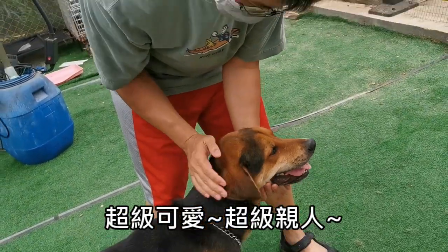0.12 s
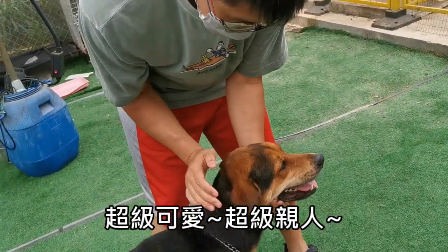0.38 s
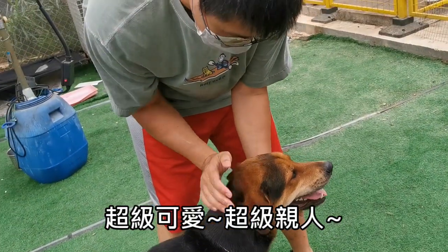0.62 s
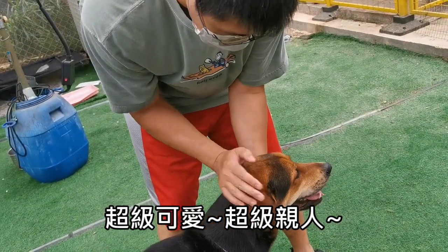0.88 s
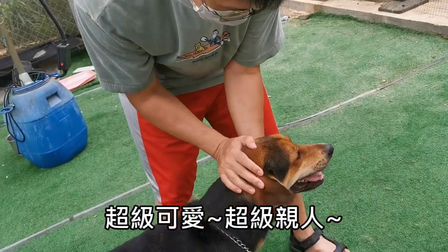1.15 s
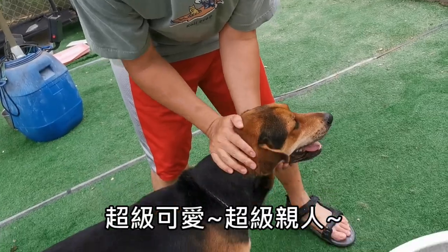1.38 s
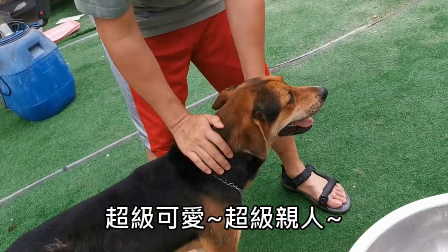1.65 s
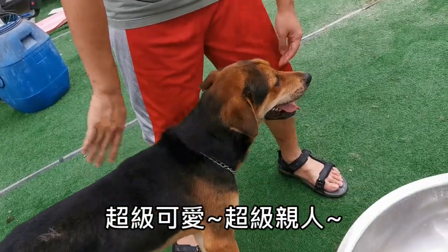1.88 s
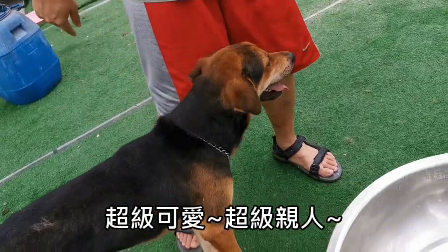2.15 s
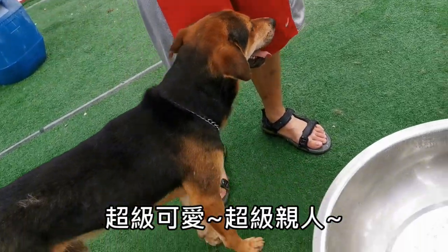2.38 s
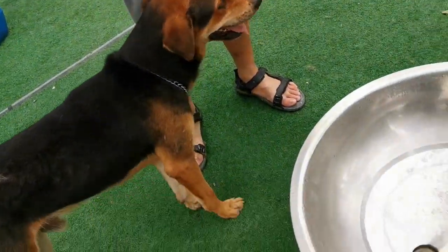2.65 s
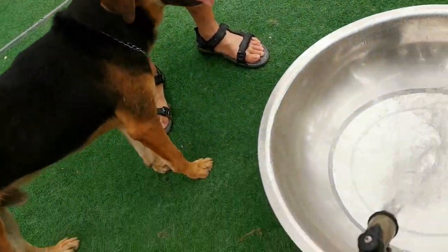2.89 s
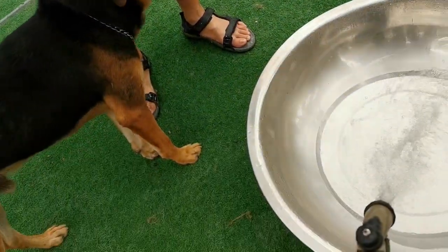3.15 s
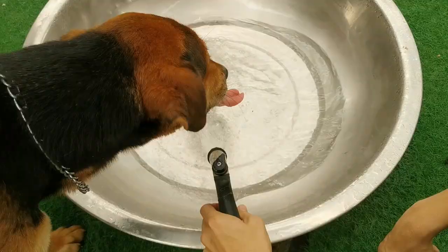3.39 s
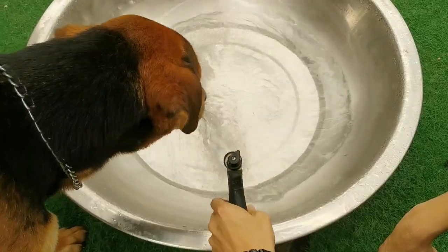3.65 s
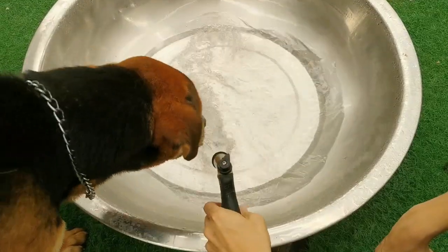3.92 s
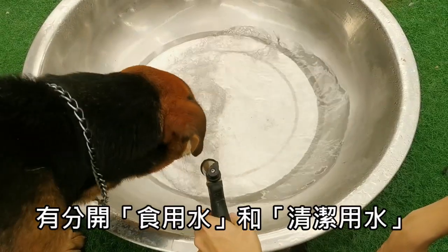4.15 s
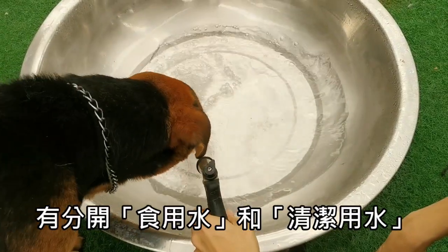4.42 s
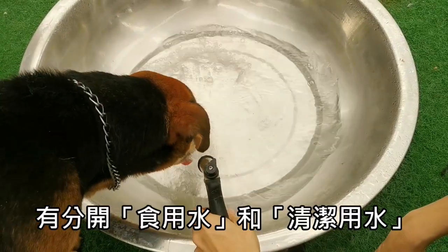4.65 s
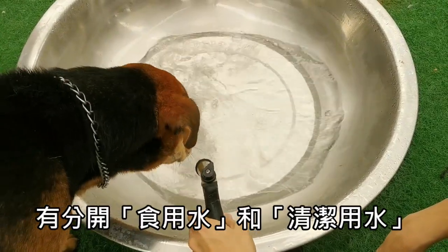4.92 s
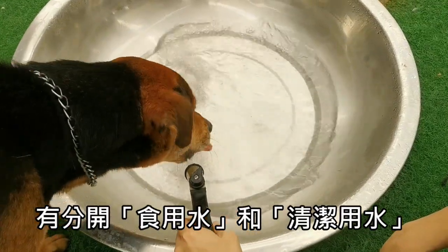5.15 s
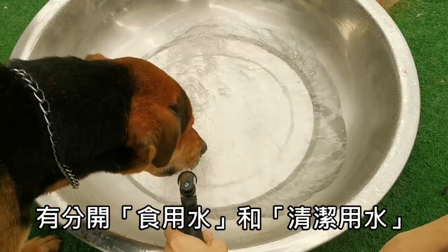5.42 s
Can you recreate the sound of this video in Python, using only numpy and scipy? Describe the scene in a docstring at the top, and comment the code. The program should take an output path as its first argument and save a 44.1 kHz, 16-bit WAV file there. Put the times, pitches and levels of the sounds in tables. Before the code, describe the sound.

Outdoors, a hand-held phone picks up a hose jet drumming hollowly on a big thin steel bowl, with hissing spray and crisp spatters. A low wavering pump-like hum and rumble lie beneath. Just after three seconds a quick cluster of dull thumps knocks the bowl, then all sound cuts to a short silence. The water returns softer and less metallic, running over shallow water until the end.

```python
"""Hose jet in a steel bowl

Outdoors, a hose jet fills a large steel bowl, heard by a hand-held phone with two unlike microphone ports.
First part: the jet drums the thin bowl (noise through its modes), spatters on the steel (short treble bursts),
and something bumps the bowl (dying low modes). After a silence, second part: the jet runs quieter over shallow
water (flickering noise). A pump-like hum of wavering tones and a low noise rumble lie under both."""
import sys
import numpy as np
from scipy import signal
from scipy.fft import rfft, irfft, next_fast_len
from scipy.io import wavfile
from scipy.ndimage import uniform_filter1d, map_coordinates

SR = 44100
rng = np.random.default_rng(int(sys.argv[2]) if len(sys.argv) > 2 else 0)


def gain_from_db(level_db):
    """Convert decibel levels to linear amplitude factors (20 dB per decade)."""
    decades = np.asarray(level_db, float) / 20
    return 10 ** decades


def waveform_to_disk(signal):
    """Save audio, clipped to [-1, 1], as 16-bit WAV at the path in sys.argv[1]."""
    frames = np.transpose(np.atleast_2d(signal))
    scaled = np.clip(frames, -1, 1) * 32767
    samples = np.round(scaled).astype(np.int16)
    wavfile.write(sys.argv[1], SR, samples)


N = 244446
PADDED = next_fast_len(N + 8192)  # samples, so that filter tails do not wrap round

# the jet, one table a part: (time [s], splash level [dB], spray level [dB], landing place [0 floor centre - 1 wall])
JET = [
    [(0, -28.5, -31, 0.33), (.25, -31, -33.5, 0.34), (.5, -27.5, -30.5, .15), (.8, -26, -29.5, 0.023),
     (1.1, -30, -29.5, 0.25), (1.31, -27, -30, 0.23), (1.6, -29, -28, 0.28), (1.8, -29.5, -30.5, .6),
     (2.0, -28.5, -29.5, 0.37), (2.3, -30.5, -30, 0.44), (2.46, -29.5, -28, 0.59), (2.62, -30, -28.5, 0.63),
     (2.8, -27.5, -28, 0.94), (3.0, -31.5, -30, 0.7), (3.28, -28.5, -28, 0.78)],
    [(3.65, -30.5, -39, 1), (3.92, -28, -37, .9), (4.2, -28.5, -35, 0.49), (4.5, -29, -35.5, 0.27),
     (4.75, -29.5, -36.5, .3), (5.0, -28.5, -34, .2), (5.27, -29, -33.5, 0.4), (5.54, -30, -36, 0.72)],
]
# the bed under the jet, one table a part: (time [s], rumble level [dB], hum level [dB])
GROUND = [
    [(0, -35, -35.5), (1, -31.5, -32), (2, -32, -34), (3.2, -29.5, -32)],
    [(3.65, -35.5, -31.5), (4.4, -35.5, -29.5), (5.54, -34, -31.5)],
]


def unit(x, lo_hz=0, hi_hz=30000):
    """Scale so that the mean of the two ports has rms 1 inside the band."""
    hz = np.fft.rfftfreq(N, 1 / SR)
    middle = np.atleast_2d(x).mean(0)
    inside = np.abs(rfft(middle))[(hz >= lo_hz) & (hz < hi_hz)]
    return x * N / np.sqrt(2 * np.sum(inside ** 2))


def along(points, hz):
    """Columns of (frequency [Hz], value, ..) points, interpolated on a log frequency axis."""
    knots_hz, *columns = np.transpose(points)
    return np.array([np.interp(np.log(hz + 1), np.log(knots_hz + 1), column) for column in columns])


def curves(rows):
    """One value per sample for each column after the time."""
    knots_s, *columns = np.transpose(rows)
    return [np.interp(np.arange(N) / SR, knots_s, column) for column in columns]


def wobble(rate):
    """A smooth random curve, rate knots a second."""
    knots = rng.standard_normal(int(N * rate / SR) + 4)
    return map_coordinates(knots, [np.arange(N) * rate / SR])


def filtered(x, response):
    """x times a complex response of frequency."""
    hz = np.fft.rfftfreq(PADDED, 1 / SR)
    return irfft(rfft(x, PADDED) * response(hz), PADDED)[..., :N]


def band(lo_hz, hi_hz, order=6):
    """Pass band; a higher order gives steeper edges."""
    def response(hz):
        below = (lo_hz / (hz + 1)) ** (2 * order)
        above = (hz / hi_hz) ** (2 * order)
        return 1 / np.sqrt((1 + below) * (1 + above))
    return response


def modes(table):
    """Causal response of a set of damped resonances with alternating signs."""
    def response(hz):
        return sum((-1) ** k * gain_from_db(db) * 1j * hz * width / (centre * centre - hz * hz + 1j * hz * width)
                   for k, (centre, width, db) in enumerate(table))
    return response


def ports(part, lo_hz, hi_hz):
    """The two microphone ports' unlike colour of the water, inside one band."""
    # one table a part: (frequency [Hz], left relative density [dB per Hz], right relative density [dB per Hz])
    port_colour = [
        [(200, -50, -53.5), (686, -58.5, -52.5), (1590, -57.5, -54.5), (2240, -62.5, -52), (2640, -62.5, -52),
         (3900, -62.5, -59.5), (5300, -65, -63.5), (7120, -68, -57), (7620, -65.5, -67), (9370, -65.5, -60.5),
         (10080, -72, -61.5), (10500, -74, -55.5), (12100, -74, -62.5), (13300, -81, -58.5), (14000, -76, -70),
         (15400, -72, -59.5)],
        [(200, -65, -59.5), (606, -60, -57.5), (1400, -67.5, -58), (1790, -68.5, -57), (2320, -70, -56),
         (3130, -73.5, -61), (3930, -64, -67), (4600, -62, -70.5), (5900, -61.5, -59.5), (7400, -63, -71.5),
         (9000, -68, -67), (10100, -74, -66), (10550, -86, -57), (12300, -83, -67), (14000, -71.5, -71),
         (15200, -66.5, -69)],
    ]
    return lambda hz: gain_from_db(along(port_colour[part], hz)) * band(lo_hz, hi_hz)(hz)


def drops(part, spiky_db, rate, colour):
    """Coloured two-port noise whose strength flickers drop by drop; alike in the bass, later on the left."""
    # one table a part: (frequency [Hz], left-right likeness [0-1])
    likeness = [
        [(60, 0.95), (300, 0.99), (700, 0.77), (1400, 0.5), (3000, 0.088), (6000, .05)],
        [(60, 0.89), (300, 0.81), (700, 1), (1400, 0.38), (3000, .2), (6000, 0.041)],
    ]
    # how much later the left port hears, one value a part: [s]
    left_lag = [.0001, 0.000347]
    hz = np.fft.rfftfreq(PADDED, 1 / SR)
    flicker = gain_from_db(spiky_db * wobble(rate))
    shared, own = rfft(rng.standard_normal((2, N)) * flicker, PADDED)
    # mixing angle that gives the wanted correlation between the ports
    turn = np.arccos(np.clip(along(likeness[part], hz)[0], 0, 1)) / 2
    mid, side = shared * np.cos(turn), own * np.sin(turn)
    left = (mid + side) * np.exp(-2j * np.pi * hz * left_lag[part])
    right = mid - side
    return irfft(np.array([left, right]) * colour(hz), PADDED)[:, :N]


def rumble(part):
    """Low noise with a slowly drifting level, stronger on the left port."""
    # spectrum: (frequency [Hz], relative density [dB per Hz])
    rumble_colour = [(15, -31.5), (32, -11.5), (45, 0), (100, -0.5), (160, 1), (220, -9), (320, -20.5)]
    level_db = curves(GROUND[part])[0]
    noise = drops(part, spiky_db=-1.9, rate=1.7, colour=lambda hz: gain_from_db(along(rumble_colour, hz)[0]))
    leaning = noise * gain_from_db([[1.4], [-1.4]])
    return gain_from_db(level_db) * unit(leaning, 30, 165)


def hum(part):
    """Pump-like tones, each wavering at random in pitch and level, equal on both ports."""
    # (frequency [Hz], pitch wander [Hz], first part relative level [dB], second part relative level [dB])
    tones = [(46, 3, -12, -20.5), (185.7, 2.24, 1, 0.5), (377.5, 3.3, -11, -9.5), (669.5, 4.6, -16, -8),
             (767, 4.54, -3, -10)]
    level_db = curves(GROUND[part])[1]
    t = np.arange(N) / SR
    total = 0
    for hz, wander_hz, *tone_db in tones:
        strength = gain_from_db(tone_db[part] + 2.1 * wobble(9))
        cycles = hz * t + np.cumsum(wander_hz * wobble(30)) / SR
        total = total + strength * np.sin(2 * np.pi * cycles)
    return gain_from_db(level_db) * unit(total, 172, 200)


def bumps():
    """Dull blows rock the bowl: low modes that die at once, the high ones first."""
    # (time [s], level [dB], 60 dB decay time at 200 Hz [s], brightness [dB per octave])
    blows = [(3.101, -14.5, 0.057, 9), (3.1127, -11.5, 0.062, -3), (3.12, -13, 0.12, -3.5),
             (3.1317, -14, 0.12, 2), (3.151, -18.5, 0.16, -4.5)]
    # (frequency [Hz], relative level before the blow's brightness [dB])
    blow_modes = [(100, -0.5), (195, 3), (245, 3.5), (292, 6), (410, -2.5), (600, -9), (790, -8.5),
                  (1000, -16)]
    out, t = np.zeros(N + SR), np.arange(SR // 4) / SR
    onset = 1 - np.exp(-t / 0.0019)
    for s, db, t60, bright_db in blows:
        ring = 0
        for hz, mode_db in blow_modes:
            tilt_db = bright_db * np.log2(hz / 200)
            decay_db = -60 * t / t60 * (hz / 200) ** .5
            ring = ring + gain_from_db(mode_db + tilt_db + decay_db) * np.sin(2 * np.pi * hz * t)
        out[round(s * SR):][:len(t)] -= gain_from_db(db) * ring * onset
    return out[:N] * gain_from_db([[1.2], [-1.2]])  # leans to the left port


def small_spats(part):
    """Smaller drops, one at a random moment of each equal slot: rows like those of the biggest drops."""
    # one value a part: drops [per s]; mean level [dB]; mean left minus right [dB]
    per_second = [12, 9][part]
    mean_db = [-20, -23.5][part]
    mean_pan_db = [-3.5, -6.5][part]
    count = round(per_second * N / SR)
    place = rng.uniform(size=(count, 2))
    scatter_db = 3.5 * rng.standard_normal((count, 2))
    return np.column_stack([(np.arange(count) + place[:, 0]) / per_second, mean_db + scatter_db[:, 0],
                            6000 + 6500 * place[:, 1], mean_pan_db + scatter_db[:, 1]])


def spats(part):
    """Each drop is a burst of treble a few ms long around its own pitch, coloured by the ports."""
    # the biggest drops hitting steel and water, before the ports' colour:
    # (time [s], level [dB], pitch [Hz], left minus right [dB])
    big_spats = [(0.1664, -14, 10920, -5.0), (0.2374, -13, 8950, -4.0), (0.4227, -14, 10830, -10),
                 (0.4344, -13, 11560, -9), (0.6417, -15, 9700, -3), (0.7527, -13, 6680, -6.5),
                 (0.825, -7, 10970, -6.0), (0.8944, -11, 11020, -6.0), (0.9547, -13.5, 6930, -3),
                 (1.1338, -12, 7050, -3.0), (1.1513, -14, 6780, -1), (1.3144, -14, 10960, -6.5),
                 (1.3234, -12, 11150, -5.0), (1.5449, -9, 13270, -6.0), (1.5874, -12, 10600, -8.0),
                 (1.8044, -15, 10700, -5.0), (2.1061, -13, 12500, -2), (2.143, -10, 10660, -3),
                 (2.177, -13.5, 11240, -6.5), (2.385, -10, 10600, -7.5), (2.4394, -6, 10500, -8),
                 (2.4633, -11.5, 10750, -7.5), (2.9976, -11, 12100, -7.5), (4.0078, -15, 10900, -9),
                 (4.2594, -20, 5780, -1.5), (5.0467, -18, 10630, -4.0)]
    out, t = np.zeros((2, N + SR)), np.arange(500) / SR
    envelope = gain_from_db(-60 * t / 0.013) * (1 - np.exp(-t / 0.00039))
    for s, db, hz, pan_db in [*big_spats, *small_spats(part)]:
        rough = uniform_filter1d(rng.standard_normal((2, len(t))), size=7, axis=1)
        burst = rough / rough.std() * np.sin(2 * np.pi * hz * t) * envelope
        out[:, round(s * SR):][:, :len(t)] += gain_from_db([[db + pan_db / 2], [db - pan_db / 2]]) * burst

    def even_colour(hz):  # rms 1 over frequency on each port
        colour = ports(part, 4440, 13000)(hz)
        return colour / np.sqrt(np.mean(colour ** 2, 1, keepdims=True))
    return filtered(out[:, :N], even_colour)


def drumming():
    """The jet shakes the bare steel like a noisy drum skin; which modes ring depends on where it lands."""
    # modes in four groups, low to high pitch: (frequency [Hz], width [Hz], relative level [dB])
    bowl_modes = [
        [(286.4, 10.5, 5.5), (342.7, 20.6, 1), (392, 19, -1)],
        [(447, 30, 0.5), (475.3, 36, -2), (555.7, 30, -4.5), (617.3, 17, -2), (626, 18, -5.5)],
        [(904, 27, 0), (1075, 150, 7.5)],
        [(1242, 32, 6), (1367, 120, 0), (1427, 48, 1.5), (2190, 120, -6.5)],
    ]
    # how the jet drives each group: (best landing place [0-1], level over the force there [dB],
    # loss half a bowl away [dB], lean: left raised and right lowered by [dB])
    drive = [(0.51, -1, 2.5, -0.7), (0.19, -2, 3, -1.1), (0.92, -3, 9.5, 1), (0.53, -6, 8.5, 0.3)]
    # how hard the jet presses on the bare steel: (time [s], level [dB])
    press = [(0, -26.5), (.25, -26.5), (.72, -21), (.97, -24), (1.15, -21.5), (1.4, -23), (1.6, -23),
             (1.9, -23), (2.2, -24.5), (2.6, -22), (2.8, -25.5), (3.1, -27)]
    force_db, place = curves(press)[0], curves(JET[0])[-1]
    total = 0
    for group, (best, db, lost_db, lean_db) in zip(bowl_modes, drive):
        def shell(hz):
            return modes(group)(hz) * band(200, 2600)(hz)
        ringing = unit(drops(0, spiky_db=0.5, rate=50, colour=shell))
        away_db = lost_db * (2 * (place - best)) ** 2
        level_db = force_db + db - away_db + 0.84 * wobble(6.72)
        total = total + ringing * gain_from_db(level_db) * gain_from_db([[lean_db], [-lean_db]])
    return total


def water(part):
    """The jet splashes, fizzes and mists, all surging together; nearer the wall it breaks up finer."""
    # one pair a part: (level over the spray at the floor centre [dB], gain up to the wall [dB])
    mist_rise = [(-4, 3.4), (-7, 12)]
    finest_rise = [(-7.5, 6), (-10.5, 6)]
    splash_db, fizz_db, place = curves(JET[part])
    mist_db, finest_db = (fizz_db + db + gain_db * place for db, gain_db in (mist_rise[part], finest_rise[part]))
    surge_db = 0.55 * wobble(14) + .5 * wobble(40)
    splash = unit(drops(part, spiky_db=1.1, rate=150, colour=ports(part, 200, 3200)), 1360, 4000)
    spray = drops(part, spiky_db=[2.2, 1.3][part], rate=500, colour=ports(part, 3410, 3e4))
    # finer drops flicker on their own
    droplets = drops(part, spiky_db=[2.2, 1.4][part], rate=500, colour=ports(part, 3400, 3e4))
    mist = filtered(droplets, band(9500, 11600, order=24))
    finest = filtered(droplets, band(11600, 13700, order=24))
    # the fizz lies on both sides of the droplets' bands
    fizz = filtered(spray, lambda hz: np.hypot(band(100, 9500, order=24)(hz), band(13700, 3e4, order=24)(hz)))
    fine = unit(fizz, 3500, 9500) * gain_from_db(fizz_db) + unit(mist) * gain_from_db(mist_db) + unit(finest) * gain_from_db(finest_db)
    return splash * gain_from_db(splash_db + 0.88 * surge_db) + fine * gain_from_db(surge_db)


def sounding(part):
    """1 while a part sounds, with a very short fade at its start and end."""
    # one pair a part: (sound on [s], sound off [s])
    on_off = [(-1, 3.2935), (3.6395, 6)]
    t = np.arange(N) / SR
    fade_s = 0.0027
    return np.clip(np.minimum(t - on_off[part][0], on_off[part][1] - t) / fade_s, 0, 1)


def scene():
    """In the second part the water covers the steel and stops its drumming."""
    first = rumble(0) + hum(0) + bumps() + spats(0) + drumming() + water(0)
    second = rumble(1) + hum(1) + spats(1) + water(1)
    return first * sounding(0) + second * sounding(1)


def top_cut(x):
    """Nothing passes above the cut-off."""
    return signal.sosfilt(signal.butter(12, 17100, fs=SR, output="sos"), x)


def record(dry):
    """The phone input rounds off its highest peaks and keeps nothing from 15740 Hz up; silence between the parts."""
    rounded = dry / (1 + np.abs(dry / .97) ** 6) ** (1 / 6)
    limited = filtered(rounded, lambda hz: hz < 15740)
    finished = limited * (sounding(0) + sounding(1) > 0)
    return top_cut(finished)


dry = scene()
out = record(dry)
waveform_to_disk(out)
```